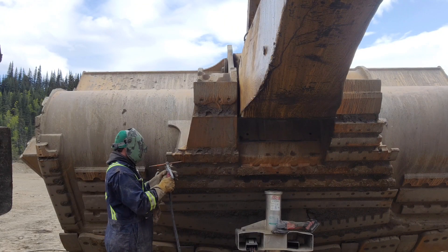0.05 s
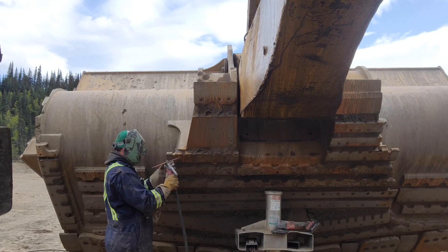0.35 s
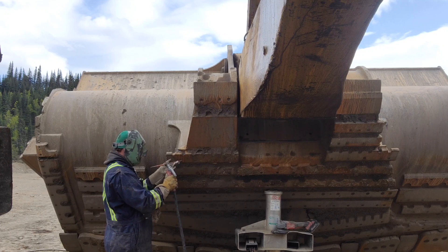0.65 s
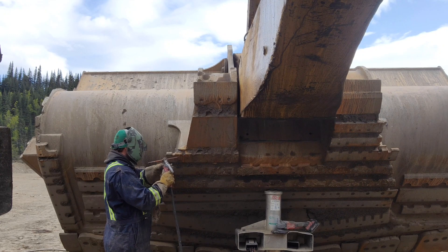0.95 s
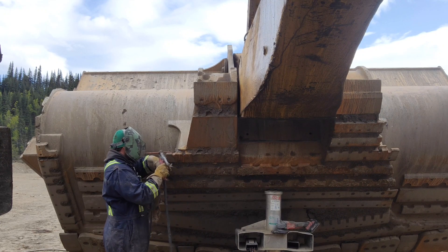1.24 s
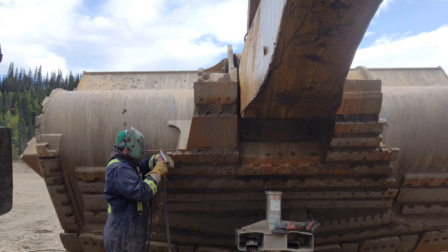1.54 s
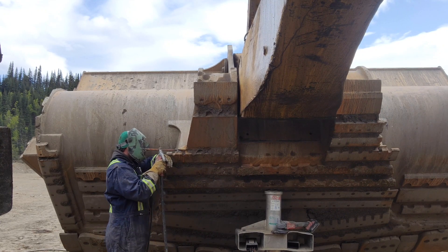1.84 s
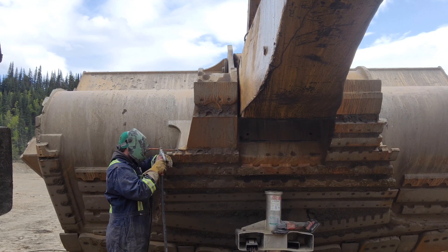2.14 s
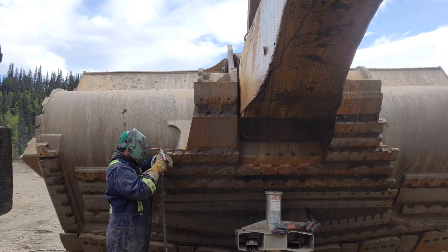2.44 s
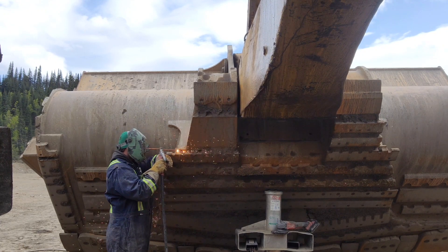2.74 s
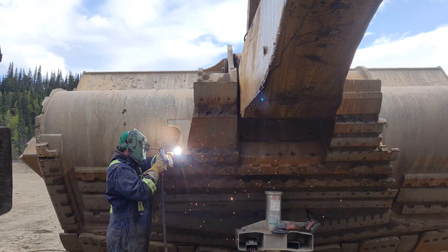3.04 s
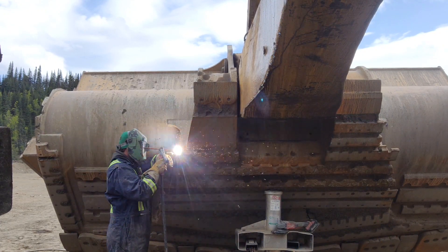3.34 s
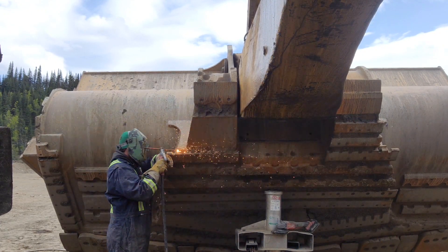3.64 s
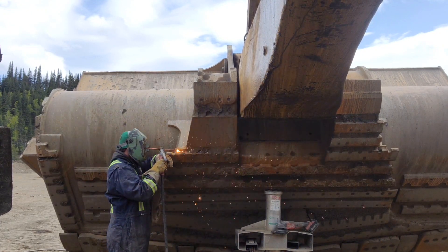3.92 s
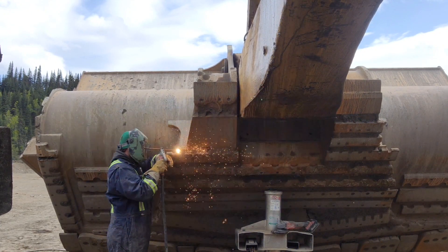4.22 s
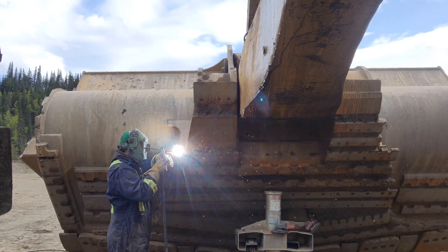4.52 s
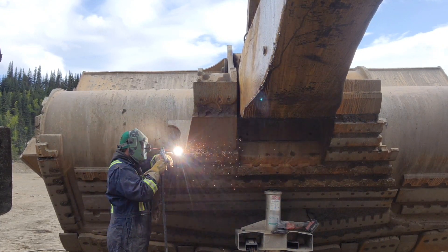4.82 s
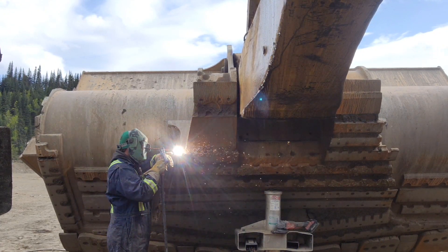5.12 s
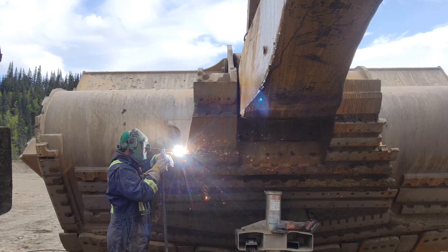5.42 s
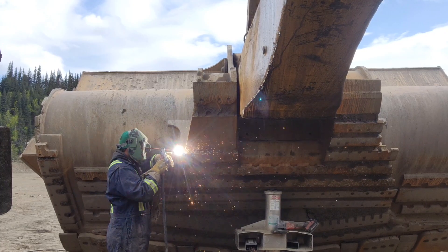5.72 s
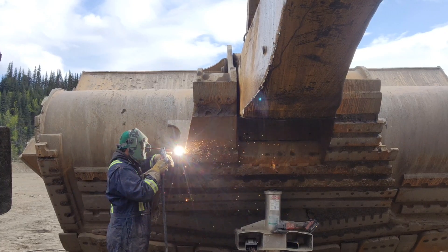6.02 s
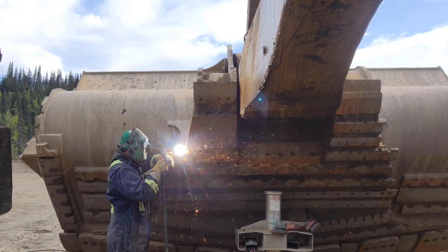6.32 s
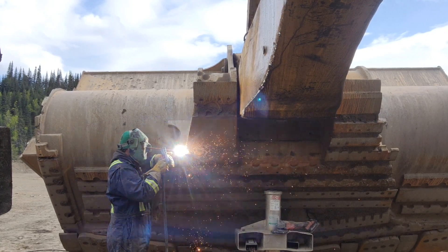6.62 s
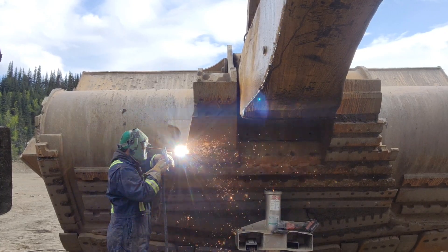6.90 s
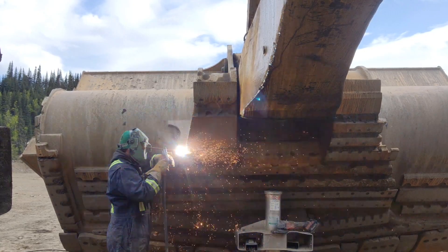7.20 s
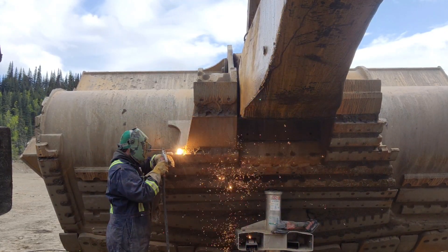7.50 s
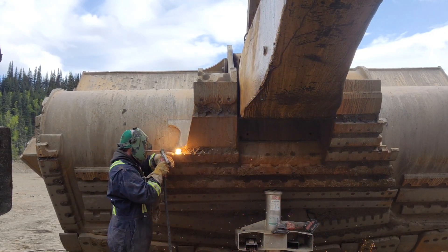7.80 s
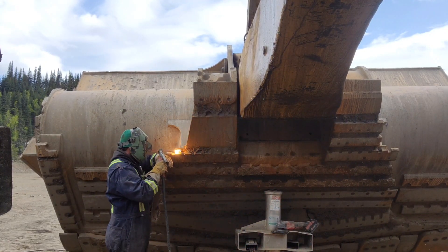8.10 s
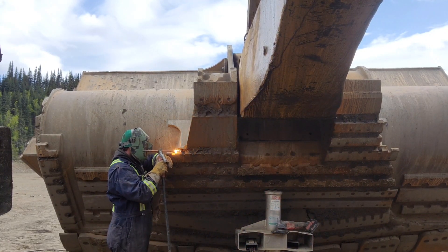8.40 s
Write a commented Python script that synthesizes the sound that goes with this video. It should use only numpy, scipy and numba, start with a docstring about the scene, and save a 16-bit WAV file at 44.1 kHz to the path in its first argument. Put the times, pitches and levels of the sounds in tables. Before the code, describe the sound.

A gouging torch hisses with compressed air outdoors, heard from a few metres away, with a thin, very high whistle. Behind it an engine-driven welder chugs beside a second machine's faint low drone. From about 0.3 to 1 second the hiss swells and dips, with a hollow, gliding roar as the air sweeps over a steel edge. Around 1.5 seconds a high singing tone joins it.

At 2.5 seconds the arc strikes the steel bucket, sizzling and spitting in five uneven bursts until about 4.3 seconds. The hiss drops under each burn, and the engine slows and labours. One long, crackling burn follows straight away, roaring hardest near 5.5 and 6.7 seconds, with a dull echo from the yard. It growls lower and breaks off at 7.3 seconds. The engine picks up speed again, and a softer hiss gradually swells back until the end at about 8.5 seconds.

```python
"""Outdoors, a few metres from a big steel excavator bucket that is being gouged with a carbon arc.
Compressed air hisses and whistles from the torch and roars as it sweeps over a steel edge.
Behind, an engine-driven welder chugs beside a droning second machine and labours under each burn.
The arc strikes six times, sizzling and blowing out molten metal while the groove sings along.
The bucket's faces colour the torch's sound, and the yard gives the arc a dull echo."""
import sys
import numpy as np
from scipy import signal
from scipy.fft import rfft, irfft
from scipy.io import wavfile
from scipy.ndimage import uniform_filter1d
from numba import njit

SR = 44100
rng = np.random.default_rng(int(sys.argv[2]) if len(sys.argv) > 2 else 0)


def to_wav(sig):
    """Store sig (one row per channel, or 1-D mono) as 16-bit WAV at the path in sys.argv[1].

    Samples outside -1..1 are clipped; the rate is SR.
    """
    pcm = np.clip(np.atleast_2d(sig), -1, 1) * 32767
    pcm = np.round(pcm).astype(np.int16)
    wavfile.write(sys.argv[1], SR, pcm.T)  # frames by channels


N = 377055
TIME = np.arange(N) / SR
FREQS = np.maximum(np.arange(N // 2 + 1) * SR / N, 1)

# The torch's stereo image. Each row: frequency in Hz, phase lead of the left side in radians.
LEFT_LEAD = [(0, 0), (600, 0), (800, -.6), (950, 0), (1300, 0), (1400, 2.9), (1510, 3), (1590, 0),
             (1800, -.5), (2400, .3), (2520, -1.7), (2650, .3), (3120, 0), (3280, 3.1), (3500, 2.9),
             (3780, 1.6), (3950, -.8), (4250, -.5), (4900, -1.9), (5250, -1.6), (5380, -.7), (5500, -3.6),
             (5750, -.7), (6150, -2.3), (6500, -1.3), (6720, 0), (6900, -2), (7300, 1.5), (7700, 0),
             (8800, 1.9), (12000, 1.9), (15700, 2.3)]
# Peaks and notches from the steel faces, broad for the spread-out jet and sharp for the arc.
# Each row: centre in Hz, width in Hz, left and right gain in dB before scaling by depth.
JET_FACES = [(600, 394, -8.4, -9.7), (813, 269, 3.3, 8.5), (998, 143, -5.4, -5.8), (1192, 126, 0.9, 2.4),
             (1495, 532, -0.7, 3.7), (1553, 122, -5.3, -1.0), (1949, 178, -0.8, 4.7),
             (2444, 169, 0.7, -3.9), (2868, 479, 5.0, -1.3), (3220, 278, 7.8, 3.2), (4229, 818, 3.9, 2.4),
             (4522, 250, -6.9, -4.2), (4942, 374, 2.6, 5.4), (5619, 381, -1.9, 3.3),
             (6214, 164, -3.4, -1.6), (6288, 778, -2.4, 4.5), (6499, 226, 0.2, 5.6),
             (6705, 225, -6.7, -5.8), (7083, 288, -1.1, 7.0), (7677, 411, 3.3, 4.0),
             (8033, 162, -5.1, -0.4), (8479, 697, 0.7, 0.3)]
ARC_FACES = [(631, 334, -3.5, -6.9), (698, 35, -4.7, -4.4), (730, 45, -3.4, 8.4), (833, 75, 6.6, 9.7),
             (908, 35, -3.8, -1.4), (999, 70, -3.6, -5.3), (1153, 75, 7.8, 7.5), (1241, 133, 1.1, 2.3),
             (1447, 58, 6.8, 4.0), (1546, 150, -4.1, 7.9), (1695, 150, -4.4, -2.6), (1800, 95, 2.8, 3.9),
             (2078, 141, 4.8, 4.4), (2305, 46, 5.0, 7.8), (2380, 302, 1.7, -3.4), (2746, 122, 6.0, 1.7),
             (2982, 57, 9.3, 7.1), (3212, 111, 10.8, 2.9), (3562, 218, -11.8, -10.8), (3620, 477, 6.5, 9.0),
             (3867, 62, -6.0, -9.2), (4190, 150, 8.6, 5.3), (4485, 870, -2.6, 0.8),
             (4607, 86, -12.6, -14.9), (4763, 219, 7.4, 2.1), (5073, 129, 5.2, 3.4), (5228, 62, -8.4, -5.8),
             (5317, 423, 3.5, 2.7), (5528, 91, -7.9, 2.1), (5726, 101, -12.7, -5.1), (5802, 68, 0.3, 4.3),
             (6170, 456, -0.6, 5.6), (6525, 117, 8.5, 7.2), (6546, 257, -7.8, 2.6),
             (6775, 133, -10.3, -7.3), (6977, 509, 2.2, 3.8), (7261, 93, -5.0, -0.7), (7440, 134, 5.8, 2.0),
             (7700, 122, 4.2, 3.5), (7843, 56, -6.3, -4.9), (8002, 91, -7.2, -0.9), (8482, 145, -3.4, -0.7)]

# The hiss swells and drops as the torch swings into place. Each row: time in seconds, boost in dB.
HISS_SWING = [(0, 1), (.2, 1), (.3, 4.3), (.45, 3.8), (.58, 1), (.7, 3.8), (.79, .5), (.92, 4), (1, 2.5),
              (1.05, -1.5), (1.16, -1.5), (1.28, .5), (1.42, -1), (2.5, 0)]
# The jet sweeps over an edge. Each row: time in seconds, relative level in dB, gap resonance in Hz.
EDGE_SWEEP = [(0, -45, 1970), (.24, -47, 1950), (.45, -32.5, 1800), (.55, -36, 1400), (.65, -35, 1220),
              (.84, -34.5, 1240), (.93, -32, 1800), (.99, -31, 2000), (1.05, -50, 2050), (1.2, -70, 1950)]
# EQ for the free hiss and for air hitting the edge. Each row: frequency in Hz, relative gain in dB.
HISS_EQ = [(200, -31), (500, -15.5), (800, -15.5), (1200, -8), (1600, -13), (2500, -12.5), (3200, -11),
           (3900, -9.5), (5000, -.5), (6800, -.3), (7700, -7), (8300, -12.5), (11200, -12.5), (12000, -8),
           (15500, -8.3)]
EDGE_EQ = [(300, -29), (750, -13), (1200, 2), (2100, 3), (3000, 6.5), (3700, 3), (5000, 8.5), (7000, -8),
           (9000, -14), (15000, -37)]
# The nozzle's whistling tones. Each row: pitch in Hz, width in Hz, relative level in dB.
NOZZLE_TONES = [(11700, 110, -21), (15690, 110, 0)]
# The whistle's fader ride. Each row: time in seconds, relative level in dB.
WHISTLE_RIDE = [(0, -37), (1.1, -34), (1.35, -31), (2.5, -29.5), (2.7, -33.5), (2.95, -29), (3.25, -37),
                (3.55, -38), (4.1, -31), (4.75, -33.5), (6.0, -38), (7.2, -42.5), (7.5, -46), (7.62, -35),
                (8.2, -34), (8.55, -37)]

# The welder's engine sags and recovers. Each row: time in seconds, firing rate in Hz.
ENGINE_SPEED = [(0, 61.7), (2.55, 61.6), (2.7, 54.2), (2.95, 56.5), (3.2, 54.7), (3.65, 54.5), (3.92, 56.3),
                (4.1, 62.3), (4.45, 54.4), (4.9, 54.7), (6.3, 56.7), (7.18, 57.1), (7.42, 61.6),
                (7.65, 64.2), (7.85, 61.3), (8.55, 61.7)]
# The fader ride of its firing tone. Each row: time in seconds, level in dB.
FIRING_RIDE = [(0.1, -37), (2.52, -40), (2.64, -57), (2.73, -42), (2.91, -36), (3.08, -55), (3.19, -42),
               (3.4, -34), (3.84, -37), (3.96, -47), (4.07, -33), (4.33, -51), (4.57, -36), (5.03, -35),
               (7.01, -52), (7.12, -43), (7.26, -54), (7.45, -36), (7.68, -49), (8.45, -41)]
# Its fainter partials. Each row: multiple of the firing rate, level in dB.
ENGINE_ORDERS = [(.5, -80), (3, -62), (4, -54.5), (5, -61.5), (6, -57)]
# EQ for its rumbling housing. Each row: frequency in Hz, relative gain in dB.
RUMBLE_EQ = [(20, -9), (90, -4), (170, -9), (215, -1.5), (320, 2.5), (370, -2), (420, -17.5), (500, -23),
             (620, -27), (800, -22), (1300, -20.5), (4000, -29.5)]
# The second machine's drone. Each row: pitch in Hz, level in dB.
DRONE_TONES = [(36, -58), (72.5, -51), (90.5, -59.5), (135.3, -52.5)]

# The six burns. Each row: strike, attack and break in seconds, then relative levels in dB for the sizzle,
# its extra spit at the strike, the roar at the strike, the roar at the break, the groove's singing
# and the ducking of the hiss.
BURNS = [(2.539, .007, 2.748, -26.4, 3, -52, -31.5, -29, -12),
         (2.964, .02, 3.016, -27, 2.5, -33.5, -32.5, -28.5, -10.5),
         (3.083, .016, 3.648, -27.6, 4, -36, -50, -30.5, -11.5),
         (3.985, .008, 3.995, -24.5, 3, -37, -36, -30, -8.5),
         (4.1, .012, 4.254, -24.8, -2, -42, -30.5, -33, -11),
         (4.343, .017, 7.286, -24.5, 1.8, -34, -33, -38, -28)]
# How hard the electrode bites during the long cut. Each row: time in seconds, extra roar in dB.
ELECTRODE_BITE = [(4.36, 1.5), (4.48, -7), (4.57, -2), (4.67, -1), (4.77, -5.5), (5.25, 0), (5.47, 4.5),
                  (5.71, 4), (5.76, -7), (5.82, -8), (5.93, 1.5), (6.13, -3), (6.28, -2.5), (6.6, 6.3),
                  (6.85, 6.2), (7.1, 1.5), (7.28, 2.5)]
# The arc flares on pockets of molten metal and falters between them.
# Each row: time in seconds, boost in dB of which sizzle and roar each take a share.
ARC_FLARES = [(4.19, 2.5), (4.405, 2.5), (4.46, -3), (4.665, 1.5), (4.74, -3), (5.12, 2.5), (5.28, 2.5),
              (5.45, 3), (5.53, -1.5), (5.62, 1.8), (5.7, 2), (5.86, 3), (6.1, 2), (6.325, 3.5), (6.43, 3),
              (6.68, -2.5), (6.99, -3), (7.03, 1.5), (7.09, -5), (7.16, -2.5), (7.22, 1.3)]
# EQ for the arc's sizzle, its bright edge on fresh steel, its roar, the growl of a long arc
# and the yard's echo. Each row: frequency in Hz, relative gain in dB.
SIZZLE_EQ = [(500, -50), (2000, -23), (2900, -14.5), (3800, -11.5), (5000, -2), (6800, 0), (7700, -8.5),
             (8300, -14.5), (10500, -17.5), (13500, -7.5), (15500, -15.5)]
FRESH_STEEL_EQ = [(4500, -35), (6000, -6), (7000, 0), (7800, 0), (8600, -20), (12000, -35)]
ROAR_EQ = [(100, -18), (220, -20), (320, -5), (480, -11), (800, -7), (1080, -2), (1165, 2), (1270, 3.5),
           (1450, -2.8), (2500, -2), (3000, -4.7), (3800, -11), (5000, -.3), (9000, -24)]
GROWL_EQ = [(120, -25), (310, 7), (470, -20), (750, -9), (1000, -12), (1600, -7), (4000, -37)]
YARD_EQ = [(200, -17), (450, -7), (700, -4.5), (1000, -7), (1500, -17), (4000, -26), (10000, -40)]

SINCE_FIRST_STRIKE = np.maximum(TIME - BURNS[0][0], 0)
SOUND_M_S = 343


def undb(db):
    """Decibels to gain."""
    return 10 ** (np.asarray(db) / 20)


def unit(x):
    """Scale to rms 1."""
    return x / np.sqrt(np.mean(x ** 2))


def curves(rows):
    """One automation curve for each column after the time."""
    times, *columns = np.transpose(rows)
    return [np.interp(TIME, times, column) for column in columns]


def noise():
    """White noise."""
    return rng.standard_normal(N)


def wander(rate_hz):
    """A modulator gliding between random values; rms 1."""
    hold = max(int(SR / rate_hz), 2)
    steps = np.repeat(noise()[:N // hold + 1], hold)
    return unit(uniform_filter1d(steps, hold)[:N])


def eq(points):
    """Frequency response through (Hz, dB) points."""
    hz, db = np.transpose(points)
    return undb(np.interp(np.log(FREQS), np.log(hz), db))


def resonance(hz, width_hz):
    """Frequency response of a resonance with steep skirts."""
    return 1 / (1 + 1j * (FREQS ** 2 - hz ** 2) / (FREQS * width_hz * 2)) ** 2


def shaped(x, response):
    """Filter by a frequency response; rms 1."""
    return unit(irfft(rfft(x) * response, N))


@njit
def swept_band(x, hz, q):
    """State-variable band-pass whose centre moves."""
    y, band, low = np.empty(len(x)), 0., 0.
    for i in range(len(x)):
        g = np.tan(np.pi * hz[i] / SR)
        v = (band + g * (x[i] - low)) / (1 + g * (g + 1 / q))
        band, low, y[i] = 2 * v - band, low + 2 * g * v, v / q
    return y


def turbulence(width):
    """Stereo air noise: a shared centre plus a diffuse part on each side."""
    return noise() + width * rng.standard_normal((2, N))


def torch_image(pan_db):
    """Place the torch with a phase shift between the sides and more treble on the left."""
    lead = np.interp(FREQS, *np.transpose(LEFT_LEAD))
    left = eq([(7000, 0), (8500, pan_db / 2)]) * np.exp(.5j * lead)
    return np.array([left, 1 / left])


def bucket_path(faces, depth, scatter_db, t60):
    """Strong reflections cut peaks and notches; ribs and plates scatter a short tail."""
    grid_hz = np.linspace(0, SR / 2, 4096)
    db = sum(np.outer([left, right], .5 ** ((2 * (grid_hz - hz) / width) ** 2))
             for hz, width, left, right in faces)
    gain = np.array([np.interp(FREQS, grid_hz, side) for side in undb(depth * db)])
    tail = rng.standard_normal((2, SR // 4)) * np.exp(-np.log(1000) * TIME[:SR // 4] / t60)
    tail /= np.sqrt(np.sum(tail ** 2, axis=1, keepdims=True))
    return gain * (torch_image(pan_db=4.5) + undb(scatter_db) * rfft(tail, N))


def hiss_ducking():
    """The hiss ducks under each burn and swells back, more slowly after a longer one."""
    gain = np.ones(N)
    for start, _, end, *_, duck_db in BURNS:
        recover_s = .6 + .3 * (end - start)
        held = np.exp(-np.maximum(TIME - end, 0) / recover_s)
        gain = np.where(TIME >= start, 1 - (1 - undb(duck_db)) * held, gain)
    return gain


def air_jet(path, level_db, sing_db, sing_q, gap_m, echo_db):
    """Turbulent air hisses, shifts colour as the hand sways, and sings when aimed into the groove."""
    swing_db, = curves(HISS_SWING)
    sway = wander(4)
    air = turbulence(width=1.0) * undb(.57 * wander(45))
    # the echo across the swaying gap from nozzle to steel gently flanges the hiss
    echo_time = TIME - 2 * gap_m * (1 + .15 * sway) / SOUND_M_S
    echo = np.array([np.interp(echo_time, TIME, side) for side in air])
    hiss = shaped(air + undb(echo_db) * echo, path * eq(HISS_EQ)) * undb(swing_db)
    aim = np.interp(TIME, [1.2, 1.5, 2.6, 3.7], [.14, .93, .93, .2])
    sing_hz = 6480 + 35 * sway
    tone = [swept_band(swept_band(side, sing_hz, sing_q), sing_hz, sing_q)
            for side in turbulence(width=.3)]
    sing = unit(np.array(tone)) * undb([[-6], [2]])  # leans right
    sing *= aim * undb(sing_db + 2.5 * wander(14))
    return (hiss + sing) * hiss_ducking() * undb(level_db + .6 * wander(9))


def edge_roar(path, trim_db, gap_q, gap_db):
    """Air striking steel roars; the gap between nozzle and steel gives it a gliding hollow tone."""
    roar_db, gap_hz = curves(EDGE_SWEEP)
    air = turbulence(width=.5)
    hollow = np.array([swept_band(side, gap_hz, gap_q) for side in air])
    return shaped(air + undb(gap_db) * hollow, path * eq(EDGE_EQ)) * undb(roar_db + trim_db)


def nozzle_whistle(trim_db, flutter_db, dip_db, dip_s):
    """The air holes sing in narrow, unsteady tones that dip briefly each time the arc breaks."""
    ride_db, = curves(WHISTLE_RIDE)
    dips = sum((TIME > end) * np.exp(-abs(TIME - end) / dip_s) for _, _, end, *_ in BURNS)
    tones = sum(undb(db) * resonance(hz, width) for hz, width, db in NOZZLE_TONES)
    whistle = shaped(turbulence(width=.7), tones * torch_image(pan_db=6))
    return whistle * undb(ride_db + dip_db * dips + trim_db + flutter_db * wander(14))


def welder(idle_hz, loaded_hz, throb, rumble_db, side_db):
    """The engine slows under the arc's load; its exhaust hums and its housing rumbles once per firing."""
    firing_hz, = curves(ENGINE_SPEED)
    firing_db, = curves(FIRING_RIDE)
    load = np.clip((idle_hz - firing_hz) / (idle_hz - loaded_hz), 0, 1)
    softened = np.minimum(SINCE_FIRST_STRIKE / .06, 1)
    octave_db = -40.8 - 8 * load - 4.5 * softened + 1.2 * wander(12)
    phase = 2 * np.pi * np.cumsum(firing_hz * (1 + .0026 * wander(22))) / SR
    hum = undb(firing_db) * np.sin(phase) + undb(octave_db) * np.cos(2 * phase)
    for multiple, db in ENGINE_ORDERS:
        hum += undb(db + .83 * wander(8.6)) * np.sin(multiple * phase + rng.uniform(0, 2 * np.pi))
    pulse = 1 + throb * np.sin(phase)
    mid, side = (shaped(noise() * pulse, eq(RUMBLE_EQ)) for _ in range(2))
    rumble = mid + undb(side_db) * side * np.array([[1], [-1]])
    return np.sqrt(2) * hum + undb(rumble_db - 4 * softened) * rumble


def second_machine(waver_db):
    """A steadily running machine lays down a low drone of wavering tones."""
    drone = np.zeros(N)
    for hz, db in DRONE_TONES:
        drone += undb(db + waver_db * wander(1.7)) * np.sin(2 * np.pi * hz * TIME + .25 * wander(3.05))
    return np.sqrt(2) * drone


def burn_envelopes(spit_s, thin_s, release_s, sag_db_per_s):
    """Envelopes for sizzle, roar, growl and singing: each burn spits, holds and quickly dies."""
    bite_db, = curves(ELECTRODE_BITE)
    sizzle, roar, growl, sing = np.zeros((4, N))
    for start, attack_s, end, sizzle_db, spit_db, strike_db, break_db, sing_db, _ in BURNS:
        attack = np.clip((TIME - start) / attack_s + 1, 0, 1)
        gate = attack * np.exp(-np.maximum(TIME - end, 0) / release_s)
        age = np.maximum(TIME - start, 0)
        to_break = np.maximum(end - TIME, 0)
        spit = np.exp(-age / spit_s)
        thinning_db = -5 * np.exp(-to_break / thin_s)
        sag_db = sag_db_per_s * age  # the electrode burns down
        sizzle += gate * undb(sizzle_db + spit_db * spit + sag_db + thinning_db + .15 * bite_db)
        sing += gate * undb(sing_db + 5 * spit + thinning_db)
        blast = gate * undb(np.interp(TIME, [start, end], [strike_db, break_db]) + bite_db)
        roar += blast
        # the arc lengthens before it breaks, and a long arc growls lower
        stretch = np.exp(-to_break / (.16 * (end - start)))
        growl += blast * (.36 + stretch)
    return sizzle, roar, growl, sing


def pops(per_s, spread_db):
    """Clicks at random moments, many small and a few large."""
    size = undb(spread_db * np.minimum(rng.exponential(size=N), 4))
    return unit((rng.random(N) < per_s / SR) * size * np.sign(noise()))


def arc(path, sizzle_db, fresh_db, roar_db, growl_db, sing_db, flare_s):
    """Tiny explosions of molten metal crackle in the air stream; the groove sings with them."""
    sizzle_env, roar_env, growl_env, sing_env = burn_envelopes(
        spit_s=.06, thin_s=.015, release_s=.012, sag_db_per_s=-.6)
    sputter = undb(wander(55) + .25 * wander(300))
    crackle = (pops(per_s=3200, spread_db=1.5) + .59 * rng.standard_normal((2, N))) * sputter
    sizzle = shaped(crackle, path * eq(SIZZLE_EQ)) * undb(sizzle_db + .45 * wander(16))
    # fresh steel adds a bright edge that fades as the groove deepens
    sizzle += shaped(crackle, path * eq(FRESH_STEEL_EQ)) * undb(fresh_db - 9 * SINCE_FIRST_STRIKE)
    roar = shaped(crackle, path * eq(ROAR_EQ)) * undb(roar_db)
    growl = shaped(crackle.mean(axis=0), eq(GROWL_EQ)) * undb(growl_db)
    sing = shaped(turbulence(width=.22) * sputter, resonance(hz=6510, width_hz=64))
    sing *= undb([[-7], [2]]) * undb(sing_db + 2.5 * wander(18))  # leans right and flickers
    flare_db = sum(db * np.exp(-((TIME - at) / flare_s) ** 2) for at, db in ARC_FLARES)
    sizzle *= undb(.85 * flare_db)
    roar *= undb(.7 * flare_db)
    return sizzle_env * sizzle + roar_env * roar + growl_env * growl + sing_env * sing


def yard_echo(sound, send_db, t60):
    """Machines and trees across the yard return a dull, late echo."""
    envelope = np.clip(TIME / .042, 0, 1) * np.exp(-np.log(1000) * TIME / t60)
    tail = rng.standard_normal((2, N)) * envelope / np.sqrt(np.sum(envelope ** 2))
    return undb(send_db) * irfft(rfft(sound.mean(axis=0)) * rfft(tail) * eq(YARD_EQ), N)


def scene():
    """The torch in front of the bucket, the machines a touch to the right."""
    jet_path = bucket_path(JET_FACES, depth=1.01, scatter_db=-6, t60=.069)
    arc_path = bucket_path(ARC_FACES, depth=1.1, scatter_db=-6, t60=.17)
    air = air_jet(jet_path, level_db=-28.2, sing_db=-8.5, sing_q=30., gap_m=.09, echo_db=-13)
    air += edge_roar(jet_path, trim_db=3, gap_q=6., gap_db=11.5)
    air += nozzle_whistle(trim_db=1, flutter_db=1.9, dip_db=-7, dip_s=.08)
    burns = arc(arc_path, sizzle_db=-1.5, fresh_db=-10, roar_db=-.1, growl_db=-9.2, sing_db=-2,
                flare_s=.022)
    machines = welder(idle_hz=61.7, loaded_hz=54.5, throb=.28, rumble_db=-38.5, side_db=-21)
    machines += second_machine(waver_db=2.8)
    return air + machines * undb([[-.2], [.2]]) + burns + yard_echo(burns, send_db=-11, t60=1.0)


def record(dry):
    """Master chain: a slightly different low cut on each side, soft clipping and a steep high cut."""
    low_cut = [signal.lfilter(*signal.butter(1, hz, "high", fs=SR), side)
               for side, hz in zip(dry, (22, 7))]
    rounded = .5 * np.tanh(np.array(low_cut) / .5)
    high_cut = signal.ellip(12, .1, 80, 15850, fs=SR, output="sos")
    return signal.sosfilt(high_cut, rounded)


dry = scene()
out = record(dry)
to_wav(out)
```